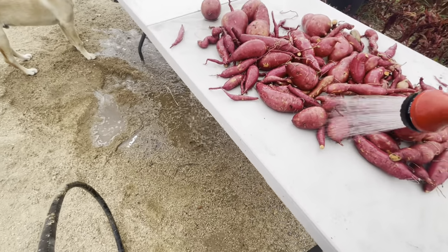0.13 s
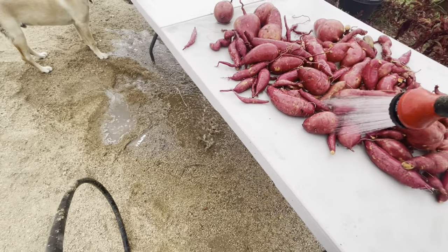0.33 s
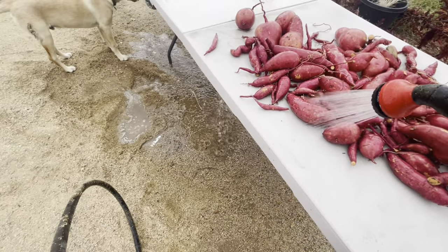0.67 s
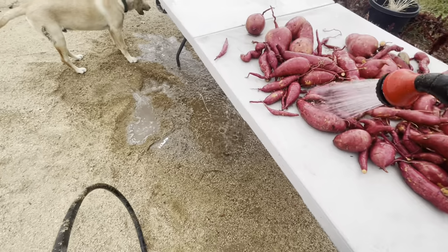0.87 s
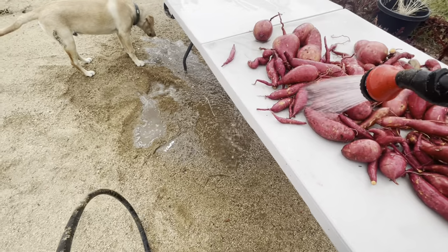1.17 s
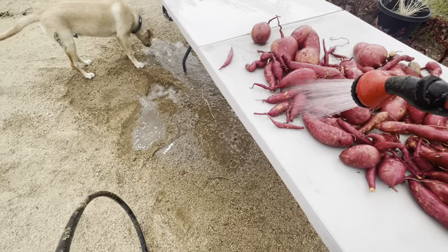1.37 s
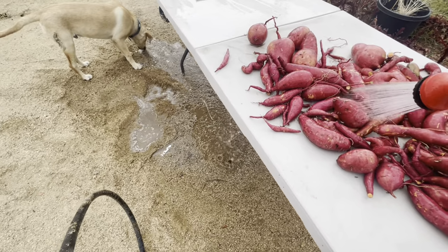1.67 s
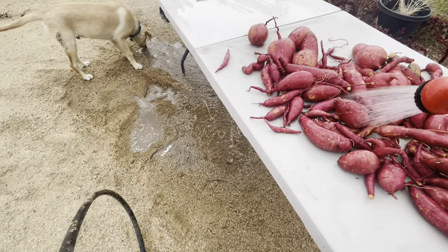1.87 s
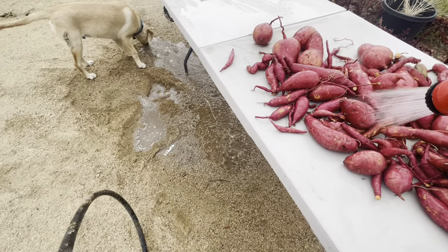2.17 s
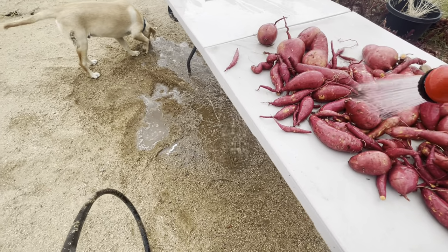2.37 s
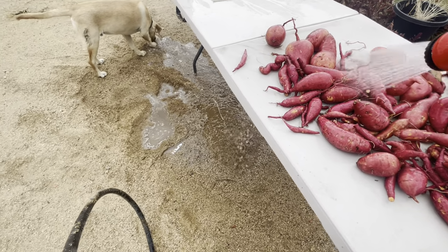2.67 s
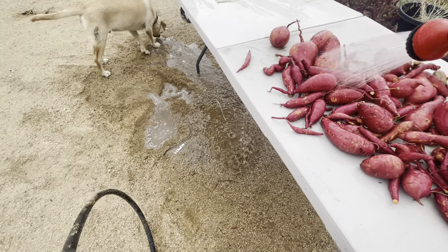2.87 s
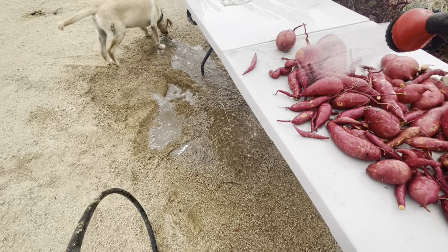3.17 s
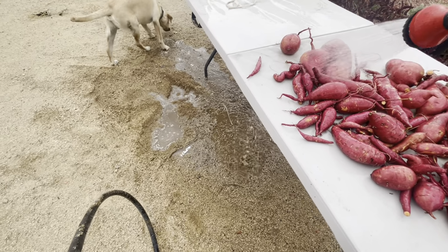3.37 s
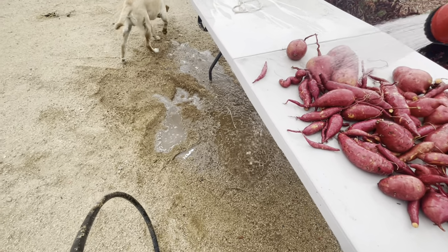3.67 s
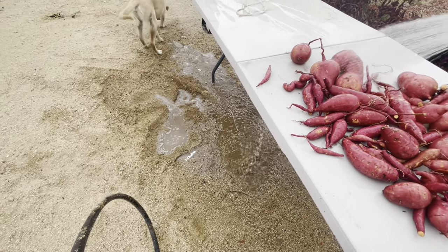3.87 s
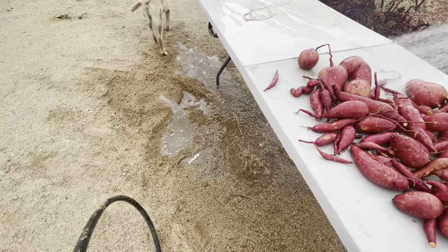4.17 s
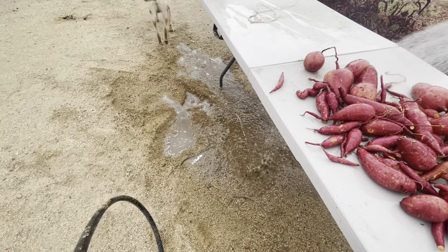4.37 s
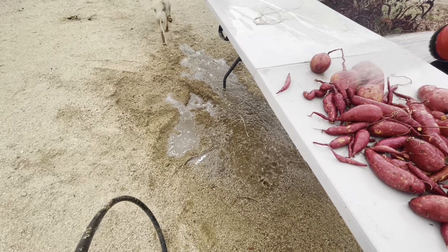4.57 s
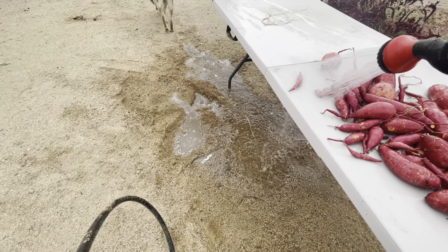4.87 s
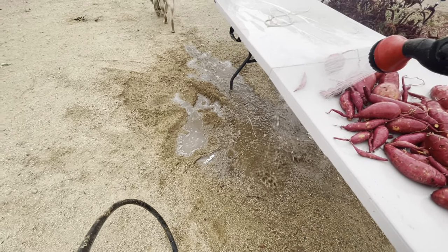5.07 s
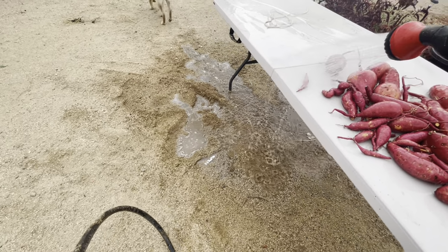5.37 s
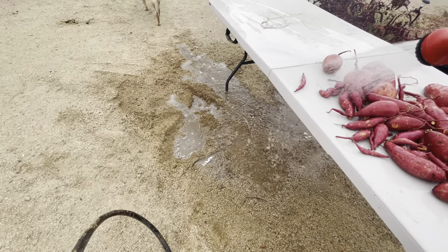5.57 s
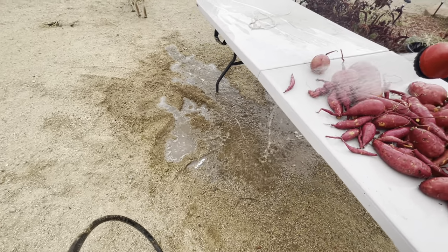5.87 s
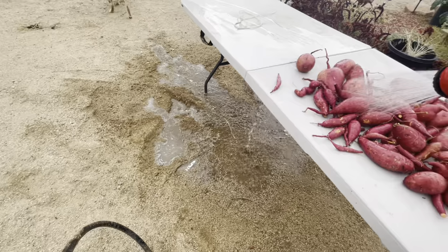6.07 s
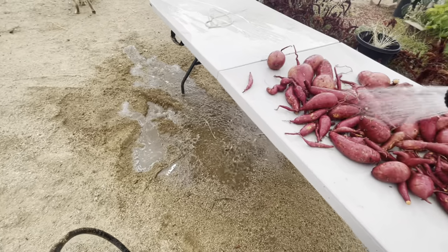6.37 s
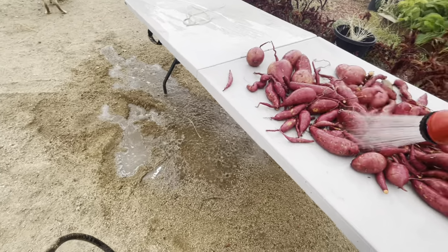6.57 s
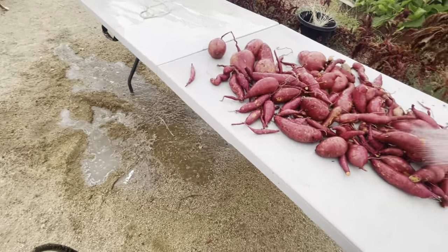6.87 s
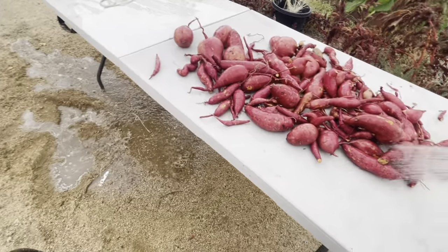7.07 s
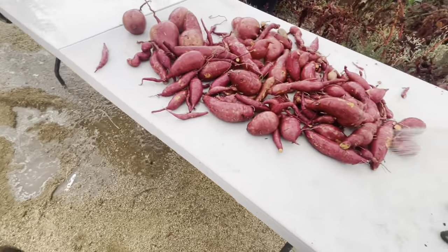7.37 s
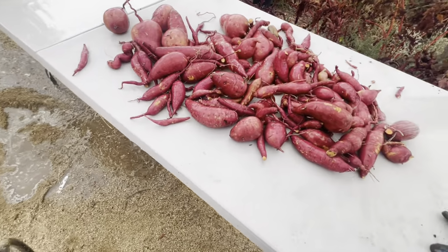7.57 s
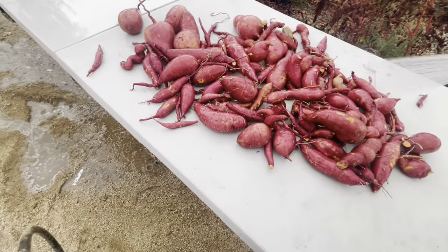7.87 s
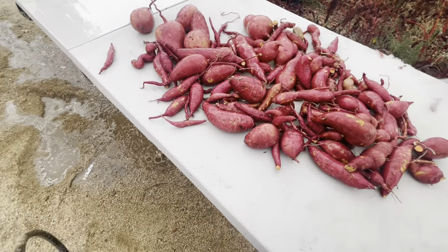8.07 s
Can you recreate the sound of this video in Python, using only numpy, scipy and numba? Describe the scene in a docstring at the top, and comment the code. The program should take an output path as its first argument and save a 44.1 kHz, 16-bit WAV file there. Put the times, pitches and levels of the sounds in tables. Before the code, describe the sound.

Crisp hissing water showers a pile of sweet potatoes on a plastic table, with glittering ticks and drips splatting onto wet sand.

```python
"""Hissing water jets and bright drop ticks come first: a hose nozzle showers root vegetables outdoors.
Jets and fine wash are flickering noise; drops on skins and wet sand are short rings that swell and die.
Some run-off splats sound lower and rounder. Drops also echo off the plastic table top and throw spatter.
Behind them water splashes on the hollow table and drums it, a few dull knocks sound,
and a low outdoor rumble wavers. Two phone ports an arm's length away hear it all."""
import sys
import numpy as np
from scipy import signal
from scipy.fft import rfft, irfft, next_fast_len
from scipy.io import wavfile
from scipy.ndimage import uniform_filter1d, map_coordinates
from numba import njit

SR = 44100
rng = np.random.default_rng(int(sys.argv[2]) if len(sys.argv) > 2 else 0)


def waveform_to_disk(signal):
    """Save audio, clipped to [-1, 1], as 16-bit WAV at the path in sys.argv[1]."""
    frames = np.transpose(np.atleast_2d(signal))
    scaled = np.clip(frames, -1, 1) * 32767
    samples = np.round(scaled).astype(np.int16)
    wavfile.write(sys.argv[1], SR, samples)


N = 362061
SIZE = next_fast_len(N)
HZ = np.fft.rfftfreq(SIZE, 1 / SR)


def undb(db):
    """Turn decibels into a gain."""
    return 10 ** (np.asarray(db) / 20)


def level(x, db):
    """Set the average (rms) level."""
    return x * undb(db) / np.sqrt(np.mean(x ** 2))


def shape(points):
    """Read a value at every frequency from (pitch_hz, value) points on a log axis."""
    hz, value = np.transpose(points)
    return np.interp(np.log(HZ + 1), np.log(hz + 1), value)


def colour(x, gain):
    """Filter a sound by a gain for every frequency."""
    return irfft(rfft(x, SIZE) * gain, SIZE)[..., :N]


def curves(table):
    """Join the rows of each column after start_s by straight lines, one value per sample."""
    s, *columns = np.transpose(table)
    return [np.interp(np.arange(N) / SR, s, column) for column in columns]


def walk(rate):
    """Make a smooth random curve with a spread of 1, drawing a new value `rate` times a second."""
    hold = int(SR / rate)
    values = rng.standard_normal(N // 50)[:N // hold + 1]
    x = np.repeat(values, hold)
    x = uniform_filter1d(uniform_filter1d(x, hold), hold)[:N]
    return x / x.std()


def half_octave(centre_hz):
    """Pass a band that fades out half an octave either side of its centre."""
    return np.cos(np.pi * np.clip(np.log2((HZ + 1) / centre_hz), -.5, .5))


def bands(points, alike, flicker_db, rate, shared_db):
    """Noise in half-octave bands, each flickering alone over a shared waver; alike = left-right likeness."""
    noise = rfft(rng.standard_normal((2, SIZE))) * undb(shape(points))
    low, high = np.log2([points[0][0], points[-1][0]])
    out = 0
    for octave in np.arange(low, high, .5):
        band = irfft(noise * half_octave(2 ** octave), SIZE)[:, :N]
        out = out + band * undb(flicker_db * walk(rate))
    mid, side = out * undb(shared_db)
    both = np.sqrt(1 + alike) * mid
    apart = np.sqrt(1 - alike) * side * np.array([[1], [-1]])
    return level(both + apart, 0)


@njit
def grains(n, start, hz, cycles, size, pan, lag):
    """Short rings that swell and die in a few cycles, peak = size; the right port hears them lag samples later."""
    out = np.zeros((2, n + 4096))
    for g in range(len(start)):
        tau = cycles[g] * SR / hz[g] / 3  # samples from start to peak
        for c in range(2):
            at = start[g] + 64 + c * lag[g]
            gain = size[g] * (pan[g] if c == 0 else 1 / pan[g])
            for i in range(1, min(int(9 * tau) + 2, 3000)):
                t = i - (at - int(at))
                swell = t / tau * np.exp(1 - t / tau)
                out[c, int(at) + i] += gain * swell * np.sin(2 * np.pi * hz[g] * t / SR)
    return out[:, 64:n + 64]


def shower(count, lo_hz, hi_hz, cycles, scatter_db, most_db, pan_db, lag, clump_db):
    """Random drops, most tiny and a few large, landing in clumps at scattered places."""
    when, pitch, length = rng.random((count, 3)).T
    bigness = rng.exponential(size=count)
    side, delay = rng.standard_normal((count, 2)).T
    size_db = most_db * np.tanh(scatter_db * bigness / most_db)  # never above most_db
    size = undb(size_db + clump_db[(when * N).astype(int)])
    pan = undb(pan_db * side / 2)
    size = size / np.hypot(pan, 1 / pan)  # the place moves a drop sideways without making it louder
    hz = lo_hz * (hi_hz / lo_hz) ** pitch
    lags = np.clip(lag * delay, -60, 60)  # samples
    return level(grains(N, when * N, hz, cycles * (.5 + length), size, pan, lags), 0)


# Bright treble colour of hiss, small ticks and spatter as heard, strongest near 8.7 kHz:
# pitch_hz [Hz], level_db [relative dB per Hz]
BRIGHT_COLOUR = [(1500, -56), (2500, -35.5), (3500, -22.5), (5500, -13.5), (7000, -5), (8700, 5),
                 (9700, 4.5), (10400, -7), (11300, -5), (12400, -9), (13600, -29), (14500, -5),
                 (16000, -12)]


def jets(sputter_db):
    """Rushing jets hiss as flickering noise, nearly the same at both ports."""
    return bands(BRIGHT_COLOUR, alike=.93, flicker_db=2.6, rate=30, shared_db=0.14 * sputter_db)


def small_ticks(sputter_db):
    """Small drops tick on the skins as a crowd of short high rings with the bright treble colour."""
    ticks = shower(count=14000, lo_hz=4260, hi_hz=12060, cycles=4.0, scatter_db=10.0, most_db=15,
                   pan_db=12.5, lag=.4, clump_db=sputter_db)
    return level(colour(ticks, undb(shape(BRIGHT_COLOUR))), 0.079)


# Bright ticks of the largest drops on the skins, before the ring gains:
# start_s [s, about 1.1 ms before the rings begin], level_db [dB], pitch_hz [Hz]
LARGE_TICKS = [(0.1216, -19, 8900), (0.177, -24, 8800), (0.306, -24, 8700), (0.386, -31, 8580),
               (0.409, -23, 8260), (0.4703, -35, 8900), (0.5696, -16.5, 8840), (0.5744, -24, 8480),
               (0.637, -22, 9400), (0.6835, -20, 8100), (0.7264, -21, 8820), (0.7458, -21, 8840),
               (0.826, -28, 9100), (0.879, -18.5, 10000), (0.9436, -21.5, 8460), (0.9914, -30, 8400),
               (1.0763, -17.5, 8650), (1.185, -23, 9200), (1.251, -24, 9380), (1.272, -25, 8800),
               (1.297, -8.5, 8700), (1.3568, -15.5, 9600), (1.3696, -22, 8570), (1.4825, -23, 8100),
               (1.5247, -21, 9010), (1.5473, -27, 8510), (1.68, -17.5, 9000), (1.762, -24, 8800),
               (1.7682, -26, 9090), (1.905, -20, 8700), (1.967, -31, 8550), (1.9899, -25, 8150),
               (2.041, -21, 8300), (2.071, -25, 8990), (2.1196, -23, 8940), (2.1339, -19.5, 9100),
               (2.187, -19.5, 9040), (2.276, -17.5, 9170), (2.5456, -30, 8210), (2.607, -20.5, 8450),
               (2.6354, -23, 9100), (2.7768, -20.5, 8740), (2.8406, -26, 8590), (2.8738, -11.5, 8100),
               (2.987, -28, 8340), (3.0714, -32, 8640), (3.112, -24, 9000), (3.154, -21, 8940),
               (3.1815, -22, 9110), (3.2084, -16.5, 9510), (3.2201, -24, 8230), (3.2539, -16.5, 9400),
               (3.281, -16.5, 9020), (3.3082, -13, 8900), (3.3844, -15.5, 9100), (3.4574, -14, 8800),
               (3.49, -15, 8600), (3.5, -17, 8600), (3.562, -23, 8650), (3.5721, -20, 8570),
               (3.8243, -25, 8570), (3.909, -15, 8700), (3.9124, -22, 8460), (3.9265, -16.5, 8640),
               (3.9845, -21, 9200), (4.0516, -33, 9000), (4.074, -24, 8750), (4.213, -27, 8700),
               (4.2433, -20.5, 8700), (4.374, -21.5, 8700), (4.4169, -31, 8540), (4.431, -18.5, 8700),
               (4.4578, -21.5, 8600), (4.4817, -15, 8950), (4.5688, -22, 8280), (4.769, -30, 8800),
               (4.7836, -27, 9000), (4.802, -25, 8640), (4.87, -22, 8800), (4.891, -23, 8700),
               (4.9407, -16, 9400), (4.9886, -30, 8540), (5.061, -18, 8900), (5.1522, -16.5, 9500),
               (5.166, -21, 9260), (5.2311, -23, 9300), (5.2625, -18.5, 9100), (5.2697, -27, 9200),
               (5.3381, -27, 8360), (5.4221, -30, 8600), (5.469, -19, 7900), (5.507, -19, 8550),
               (5.5214, -28, 9000), (5.531, -16, 9130), (5.6366, -28, 9030), (5.654, -23.5, 8160),
               (5.6925, -21, 9380), (5.8067, -9.5, 8950), (5.9415, -21, 8700), (5.971, -28, 8960),
               (5.9966, -19, 9100), (6.0612, -21.5, 9100), (6.116, -21.5, 8400), (6.2353, -29, 8200),
               (6.2765, -26, 9430), (6.4188, -20.5, 8300), (6.4278, -19, 8270), (6.517, -18.5, 9350),
               (6.617, -26, 8670), (6.7847, -21.5, 8700), (6.8167, -26.5, 8600), (6.848, -23, 8980),
               (6.9216, -19, 9050), (6.9736, -27.5, 8140), (7.0198, -14.5, 8700), (7.043, -23, 8900),
               (7.1312, -21, 8800), (7.1517, -30, 8420), (7.1696, -17, 9000), (7.4075, -23, 8350),
               (7.4963, -35, 8580), (7.5304, -28, 9280), (7.5662, -41, 8050), (7.5811, -23.5, 8550),
               (7.648, -23, 8330), (7.7775, -25, 7600), (7.986, -29, 8540)]
# Rings inside one tick: ratio [multiple of its pitch], cycles [count], level_db [dB]
TICK_RING = [(1.0, 4.67, 4.5), (.75, 2.7, -5), (1.33, 2.1, -22), (.37, 2.2, -29)]


def large_ticks():
    """A large drop on a skin is a tight cluster of bright rings, centred between the ports."""
    s, level_db, pitch_hz = np.transpose(LARGE_TICKS)
    one, ticks = np.ones_like(s), 0
    for ratio, cycles, ring_db in TICK_RING:
        late, softer = rng.random((len(s), 2)).T
        start = (s + .0011 + 0.0002 * late) * SR  # start_s is counted about 1.1 ms before the rings
        size = undb(level_db + ring_db - 1.9 * softer)
        ticks = ticks + grains(N, start, pitch_hz * ratio, cycles * one, size, one, 0 * s)
    return ticks


def patter(clump_db):
    """Run-off patters on the wet sand as a crowd of very short, duller rings."""
    return shower(count=10000, lo_hz=2670, hi_hz=6700, cycles=1.7, scatter_db=2.5, most_db=14,
                  pan_db=20.0, lag=2.5, clump_db=clump_db)


DROP_LAG = 1.3  # scatter of the lag between the ports for all splats, samples
# The loudest run-off splats on the wet sand, before the ring gains:
# start_s [s], level_db [dB], pitch_hz [Hz]
SPLATS = [(0.056, -19, 5800), (0.093, -33, 4900), (0.1226, -17, 3300), (0.2136, -32, 2750),
          (0.375, -23.5, 6200), (0.5645, -30, 3430), (0.6823, -32, 5180), (0.746, -27.5, 3020),
          (0.8005, -32, 3100), (0.8112, -30, 3150), (0.8264, -27, 3180), (0.837, -28.5, 3070),
          (0.849, -25, 2980), (0.8803, -26, 4930), (0.911, -30, 3590), (0.9392, -24.5, 3270),
          (1.1847, -31, 3660), (1.2977, -11.5, 5360), (1.3188, -28, 3200), (1.3257, -24, 3580),
          (1.5486, -24, 3300), (1.6467, -34, 2770), (1.6796, -35, 5460), (1.8533, -30, 3160),
          (1.9033, -25.5, 3300), (1.9067, -27, 3450), (1.947, -28, 2940), (1.9683, -41, 2800),
          (1.999, -33, 2850), (2.0406, -21, 5600), (2.134, -37, 2800), (2.149, -25, 5560),
          (2.2254, -21.5, 3100), (2.2774, -25, 4600), (2.439, -35, 2780), (2.4541, -26, 3530),
          (2.497, -22.5, 2940), (2.534, -33, 3480), (2.629, -21, 6080), (2.7252, -28.5, 3300),
          (2.7728, -23, 3520), (2.8498, -24, 4400), (3.019, -30, 3200), (3.052, -21.5, 4770),
          (3.095, -32, 3960), (3.1133, -23, 3500), (3.2107, -11, 5700), (3.2129, -21, 5900),
          (3.2535, -27, 4800), (3.291, -18, 3600), (3.308, -29, 3490), (3.353, -24.5, 3720),
          (3.3743, -21.5, 4300), (3.4057, -21.5, 3770), (3.4516, -27, 3900), (3.491, -15.5, 4200),
          (3.5625, -27, 4550), (3.6066, -29, 4600), (3.6562, -29, 2710), (3.691, -28.5, 3310),
          (3.7279, -28, 6030), (3.7908, -18.5, 5670), (3.815, -22, 4470), (3.8504, -33, 4450),
          (3.872, -28, 4370), (3.8782, -24, 3900), (3.913, -19, 6200), (3.9403, -14.5, 5260),
          (3.9725, -25, 2970), (3.983, -26, 3400), (3.9866, -24, 6030), (4.0305, -33, 3290),
          (4.0746, -37, 4790), (4.113, -30, 3450), (4.134, -19.5, 4100), (4.152, -21.5, 3570),
          (4.214, -34.5, 2990), (4.238, -30, 3530), (4.256, -29, 3300), (4.2857, -20, 4700),
          (4.308, -23, 4600), (4.3631, -30, 3300), (4.376, -29, 3490), (4.417, -26, 4550),
          (4.4315, -24.5, 4930), (4.4586, -28, 2860), (4.4855, -21, 6110), (4.499, -24, 3550),
          (4.535, -24, 4500), (4.6654, -22, 3320), (4.7162, -17.5, 6060), (4.7528, -31, 3680),
          (4.7605, -31, 5170), (4.7693, -8.5, 6350), (4.8378, -20.5, 3230), (4.9397, -37, 5860),
          (4.9522, -27, 3480), (4.9857, -27, 4230), (5.0669, -25, 3840), (5.075, -22, 3960),
          (5.138, -21, 5880), (5.142, -24, 5900), (5.155, -20, 4050), (5.1743, -30, 3100),
          (5.184, -24, 3200), (5.2315, -41, 3820), (5.25, -28, 3880), (5.254, -19.5, 3730),
          (5.2784, -17.5, 6100), (5.339, -21.5, 3430), (5.369, -29, 2770), (5.4097, -28, 3760),
          (5.4311, -28, 6060), (5.4689, -15, 6230), (5.5127, -19.5, 3300), (5.532, -21, 4530),
          (5.5573, -20, 3700), (5.5664, -26, 3230), (5.6148, -19, 3530), (5.6456, -26, 2880),
          (5.68, -27, 3440), (5.713, -25, 3660), (5.7412, -27, 3490), (5.7582, -26, 3300),
          (5.7853, -32, 5350), (5.8076, -24, 6300), (5.8706, -28, 4760), (5.894, -28, 3640),
          (5.916, -21, 3700), (5.9346, -24, 3490), (5.942, -19, 3700), (5.9703, -34, 3400),
          (5.996, -20, 5800), (5.9964, -26, 3100), (6.028, -28, 3730), (6.0475, -27, 2900),
          (6.06, -18, 6200), (6.0863, -23, 4460), (6.116, -26, 6070), (6.1418, -27, 2970),
          (6.143, -20, 6500), (6.158, -15, 6400), (6.1684, -22.5, 3480), (6.1812, -21.5, 4550),
          (6.219, -34, 3370), (6.3606, -25, 3880), (6.4167, -24.5, 3050), (6.4282, -24, 2800),
          (6.5176, -25, 3300), (6.5715, -32, 5940), (6.697, -33.5, 3400), (6.79, -34, 3800),
          (6.871, -24.5, 5800), (6.922, -39, 5610), (7.015, -25, 5800), (7.045, -26.5, 5800),
          (7.1511, -35, 5910), (7.17, -16.5, 6200), (7.215, -24.5, 5650), (7.241, -22, 5850),
          (7.318, -31, 4000), (7.3606, -25, 5030), (7.4047, -20.5, 4400), (7.4977, -26, 5130),
          (7.535, -28, 5490), (7.6478, -26, 4800), (7.855, -24, 3800), (7.986, -25, 5700),
          (8.051, -27, 5760)]
# Rings inside one splat: ratio [multiple of its pitch], cycles [count], level_db [dB]
SPLAT_RING = [(1, 3.9, -2), (1.45, 2.15, -4), (.62, 1.85, -20)]


def splats():
    """A splat is a tight cluster of short rings from one landing place."""
    s, level_db, pitch_hz = np.transpose(SPLATS)
    side, delay = rng.standard_normal((len(s), 2)).T
    octaves = np.log2(pitch_hz / 3100)
    shorter = undb(-4 * octaves)  # higher splats ring for fewer cycles
    out = 0
    for ratio, cycles, ring_db in SPLAT_RING:
        late, length = rng.random((len(s), 2)).T
        thud_db = 9 * octaves * (ratio < 1)  # and their low ring grows
        start = (s + 0.000516 * late) * SR
        ring_cycles = cycles * shorter * (0.63 + 0.87 * length)
        size = undb(level_db + ring_db + thud_db)
        out = out + grains(N, start, pitch_hz * ratio, ring_cycles, size, undb(side), DROP_LAG * delay)
    return out


# Lower, rounder single rings of run-off splats, mostly 1.6 to 2.7 kHz, before a 0.5 dB lift:
# start_s [s], level_db [dB], pitch_hz [Hz]
ROUND_SPLATS = [(0.277, -29.5, 2300), (0.8799, -34, 1940), (1.1917, -35, 2010), (1.3932, -37, 2400),
                (1.7924, -37, 2260), (1.8965, -37, 2020), (2.4521, -25.5, 2490), (3.3733, -25.5, 2680),
                (3.491, -19.5, 2630), (3.656, -25.5, 2220), (3.8042, -37, 2070), (3.9574, -29, 2410),
                (4.03, -29.5, 2400), (4.153, -26, 2660), (4.3742, -32, 2070), (4.6644, -32, 1790),
                (4.8234, -34, 2390), (4.8409, -25, 2580), (4.9521, -27.5, 2500), (4.9937, -39, 2240),
                (5.0883, -34, 2200), (5.2484, -33, 2150), (5.2535, -30.5, 2470), (5.3393, -26, 1870),
                (5.3846, -35, 1810), (5.5747, -24.5, 2560), (5.6547, -27, 2620), (5.7683, -39, 2380),
                (5.8356, -36, 2460), (5.915, -29.5, 2300), (5.9351, -36, 2110), (5.9408, -25, 2570),
                (6.0447, -40, 1620), (6.0596, -30.5, 1970), (6.0866, -31, 2500), (6.1564, -37, 2410),
                (7.1701, -33.5, 2620), (7.2723, -35, 1200), (7.4044, -36, 2550), (7.498, -32.5, 2650)]


def round_splats():
    """A rounder run-off splat is one single ring of a little over two cycles."""
    s, level_db, pitch_hz = np.transpose(ROUND_SPLATS)
    side, delay = rng.standard_normal((len(s), 2)).T
    cycles = np.full_like(s, 2.35)
    return grains(N, s * SR, pitch_hz, cycles, undb(level_db + 0.5), undb(2 * side), DROP_LAG * delay)


def table_echo(drops):
    """The table top returns a duller copy of the drops, its delay and strength wavering."""
    delay_s = .0038 + 0.000323 * walk(40)
    at = np.arange(N) - SR * delay_s
    copy = [map_coordinates(x, [at], order=3) for x in drops]
    treble_loss = 1 / np.hypot(1, (HZ / 8100) ** 2)
    return colour(copy, undb(-5.5) * treble_loss) * undb(3 * walk(60))


def spatter(drops):
    """Drops throw a fading patter of tiny droplets: noise that follows their power band by band."""
    keep = 10 ** (-6 / (0.058 * SR))  # power falls 60 dB in 0.058 s
    droplets = undb(4.5 * walk(500))
    noise = rng.standard_normal(N) + .35 * rng.standard_normal((2, N))  # shared by the ports + their own
    fine = rfft(droplets * noise, SIZE) * undb(shape(BRIGHT_COLOUR) / 2)
    spectrum, out = rfft(drops, SIZE), 0
    for hz in 1500 * 2. ** (np.arange(7) / 2):
        band = half_octave(hz)
        power = np.mean(irfft(spectrum * band, SIZE)[:, :N] ** 2, axis=0)
        power = signal.lfilter([1 - keep], [1, -keep], power)
        out = out + np.sqrt(power) * level(irfft(fine * band, SIZE)[:, :N], -4)
    return out


# Colour of the wash: pitch_hz [Hz], level_db [relative dB per Hz]
WASH_COLOUR = [(1300, -22), (1900, -10), (2600, 1), (3500, 0), (5000, 0.5), (6300, 4), (8000, 1.5)]


def wash(clump_db):
    """Drops too fine to hear singly blur into noise, almost unrelated at the two ports."""
    return bands(WASH_COLOUR, alike=0.043, flicker_db=1.5, rate=25, shared_db=.4 * clump_db)


# Colours of the splash, the drumming and the boom: pitch_hz [Hz], level_db [relative dB per Hz]
SPLASH_COLOUR = [(450, -13.5), (750, 1.5), (1150, -1.5), (2000, 0), (3000, -7.5), (4500, -27)]
DRUM_COLOUR = [(65, -19), (110, -3.5), (290, -5.5), (368, -2.5), (546, -9), (700, -6.5), (910, -53),
               (1540, -120)]
BOOM_COLOUR = [(90, -27), (130, -6), (185, -0.5), (240, -4), (330, -11)]
# Water that reaches the bare table top:
# start_s [s], splash_db [dB], drumming_db [dB], boom_db [dB] (boom of the hollow top)
ON_TABLE = [(0.0, -49, -58.5, -62), (0.3, -52, -59.5, -60.5), (0.64, -56.5, -60, -80),
            (1.32, -56, -65, -79), (1.5, -56.5, -63, -72), (1.56, -62, -62.5, -76), (1.75, -57, -61, -70),
            (2.45, -53, -62.5, -74), (2.93, -63, -66, -86), (3.54, -56.5, -62, -71.5),
            (4.3, -56, -57.5, -59), (4.8, -50, -62.5, -66), (5.46, -55, -59, -68), (6.45, -57, -62, -79),
            (6.7, -58, -63, -75), (6.8, -65, -65.5, -82), (6.93, -60.5, -64, -84), (7.05, -52, -64, -80),
            (7.13, -54, -69, -74), (7.22, -52, -70, -67), (7.3, -47, -59, -56), (7.38, -50, -61, -73),
            (7.47, -55.5, -61, -64), (7.85, -58.5, -56, -71), (7.95, -54, -59, -59),
            (8.13, -53.5, -56, -58), (8.21, -55.5, -57.5, -59)]


def water_on_table(clump_db):
    """Water splashes on the bare top; gushes drum it and make its hollow boom, all as coloured noise."""
    splash_db, drumming_db, boom_db = curves(ON_TABLE)
    gush_db = 1.5 * walk(7)
    splash = bands(SPLASH_COLOUR, alike=0.16, flicker_db=2.64, rate=20, shared_db=0.21 * clump_db)
    drumming = bands(DRUM_COLOUR, alike=0.66, flicker_db=1.55, rate=8.0, shared_db=gush_db)
    boom = bands(BOOM_COLOUR, alike=0.77, flicker_db=1.5, rate=9.8, shared_db=gush_db)
    return splash * undb(splash_db) + drumming * undb(drumming_db) + boom * undb(boom_db)


# Dull knocks on the table, before the ring gains:
# start_s [s], level_db [dB], pitch_hz [Hz], fade_s [s, about 60 dB]
KNOCKS = [(6.479, -39, 613, 0.0088), (7.284, -39, 1160, 0.019), (7.338, -46, 1150, 0.016)]


def knocks():
    """The hollow table answers a bump with a short cluster of low rings."""
    s, level_db, pitch_hz, fade_s = np.transpose(KNOCKS)
    out = 0
    # each ring: multiple of the pitch, gain in dB
    for ratio, ring_db in [(.24, -14), (.45, -8.5), (.7, -6.5), (1, 2), (1.35, -9), (1.7, -10)]:
        hz = pitch_hz * ratio
        out = out + grains(N, s * SR, hz, fade_s * hz / 3, undb(level_db + ring_db), 1 + 0 * s, 0 * s)
    return out


# Colour of the rumble: pitch_hz [Hz], level_db [relative dB per Hz]
RUMBLE_COLOUR = [(20, -36), (40, -14), (52, -4), (66, -7), (82, 1.5), (100, -9.5), (135, -38)]
# Slow swell of the rumble, before its flutter: start_s [s], level_db [dB]
RUMBLE_LEVEL = [(0.0, -56), (0.8, -67.5), (3.68, -65), (3.73, -61.5), (4.3, -62), (5.0, -60.5),
                (5.88, -65.5), (6.45, -59), (6.62, -59), (6.7, -67.5), (7.5, -65.5), (8.05, -65.5),
                (8.21, -65)]


def rumble():
    """Low outdoor noise swells slowly and flutters."""
    level_db = curves(RUMBLE_LEVEL)[0] + 2 * walk(12)
    return bands(RUMBLE_COLOUR, alike=0.5, flicker_db=0.58, rate=3.6, shared_db=0) * undb(level_db)


# How far the left port leads the right: pitch_hz [Hz], lead_rad [radians]
PORT_LEAD = [(0, 0), (520, 1.0), (1290, 0.0), (6200, 0.2), (7150, 4.7), (7920, 5.0), (10900, 10.2),
             (11500, 12.5), (12600, 12.5), (13300, 15.7), (14000, 15.6), (14600, 18.9), (15800, 18.9),
             (16500, 18.3)]
# How much louder the left port is than the right: pitch_hz [Hz], level_db [dB]
PORT_BALANCE = [(60, -3.0), (110, -2.0), (200, 3.5), (380, 5.5), (700, 3.0), (1290, -0.5), (2380, -4.5),
                (4400, -7), (6500, -5), (8120, -1.0), (15000, 0.0)]


def two_ports(air):
    """The two ports differ in loudness and timing by pitch; each takes half of the difference."""
    left = undb(shape(PORT_BALANCE) / 2) * np.exp(.5j * shape(PORT_LEAD))
    return colour(air, [left, 1 / left])


# The spray, before drop filtering and port differences:
# start_s [s], hiss_db [dB] (skin ticks, with jets 5.5 dB lower), patter_db [dB], wash_db [dB]
FLOW = [(0.0, -42, -52, -45), (0.3, -40.5, -48.5, -45), (0.62, -44, -47.5, -53), (0.78, -42, -50, -46),
        (0.83, -42.5, -51, -44), (0.9, -44, -49.5, -52), (0.96, -42.5, -50, -53), (1.01, -38, -46.5, -41),
        (1.06, -38.5, -45, -43.5), (1.28, -42, -48, -52), (1.34, -41, -41, -47), (1.49, -37.5, -44, -41.5),
        (1.53, -43, -53, -44), (1.7, -43, -53, -51), (2.03, -41, -48, -57), (2.45, -42.5, -50, -48),
        (2.74, -43, -52, -50), (3.0, -41.5, -49.5, -53), (3.18, -42.5, -53, -51), (3.23, -41, -45, -47),
        (3.4, -42.5, -49.5, -44), (3.55, -41, -47, -47.5), (3.95, -39.5, -46, -46),
        (4.28, -39, -44.5, -45.5), (4.53, -43.5, -49, -55), (4.82, -38, -43.5, -37.5),
        (4.92, -41.5, -46, -51), (5.19, -40, -46, -41.5), (5.55, -40.5, -44, -49), (5.8, -41.5, -49, -52),
        (6.1, -42.5, -45.5, -48), (6.3, -43.5, -48, -51), (6.6, -46, -53, -53), (6.74, -48, -58, -61),
        (6.83, -54, -67, -58), (6.93, -44.5, -61, -54), (7.04, -44, -61, -48), (7.2, -48.5, -63, -55),
        (7.4, -44.5, -59, -45), (7.65, -48.5, -53.5, -58), (7.92, -48, -58, -50.5), (8.0, -42, -69, -45),
        (8.21, -46.5, -63, -45.5)]


def scene():
    """Mix the jets, the drops and their aftermath, then the table and the rumble, at two ports."""
    hiss_db, patter_db, wash_db = curves(FLOW)
    sputter_db = 1.5 * walk(25.063)  # the jets sputter
    clump_db = 0.5 * sputter_db + 1.2 * walk(30)  # the run-off follows them loosely
    drops = undb(hiss_db) * small_ticks(sputter_db) + undb(patter_db) * patter(clump_db)
    drops = drops + splats() + round_splats()
    # drops are too small to sound much below 1250 Hz
    drops = colour(drops, 1 / np.hypot(1, (1250 / (HZ + 1)) ** 3))
    large = large_ticks()
    thrown = drops + undb(-5) * large  # large ticks leave a weaker echo and spatter
    air = drops + large + table_echo(thrown) + spatter(thrown)
    air = air + undb(hiss_db - 5.5) * jets(sputter_db) + undb(wash_db) * wash(clump_db)
    air = air + water_on_table(clump_db) + knocks() + rumble()
    return two_ports(air)


# Treble response of the microphone: pitch_hz [Hz], level_db [dB]
MIC_TREBLE = [(12000, -0.5), (13500, -9), (15700, -9), (16100, -33)]


def record(dry):
    """The phone's microphone fades in the top treble and the recorder cuts the rest."""
    heard = colour(dry, undb(shape(MIC_TREBLE)))
    top_cut = signal.ellip(10, .2, 80, 16700, fs=SR, output="sos")  # low-pass at 16700 Hz
    return signal.sosfilt(top_cut, heard)


dry = scene()
out = record(dry)
waveform_to_disk(out)
```